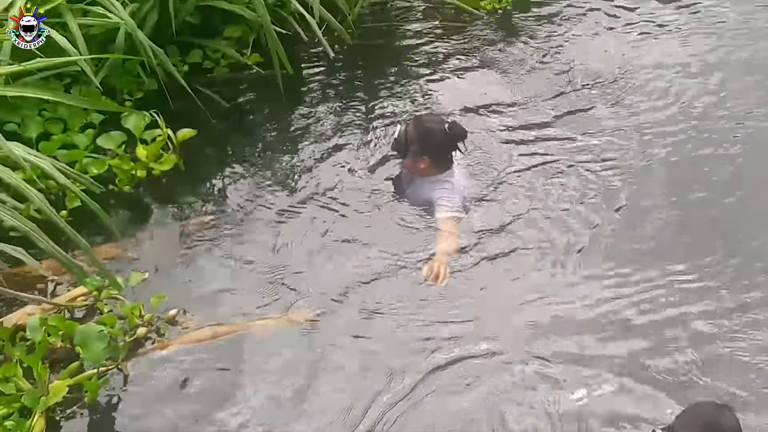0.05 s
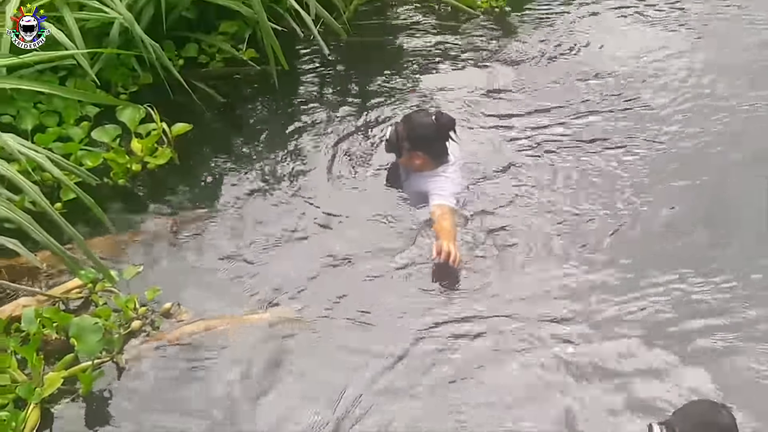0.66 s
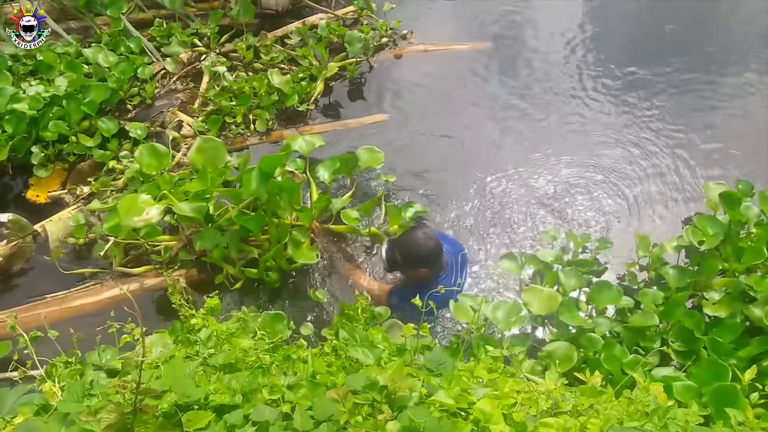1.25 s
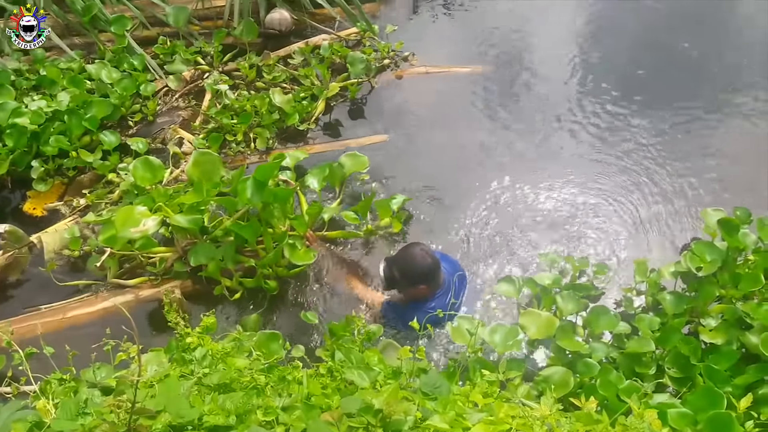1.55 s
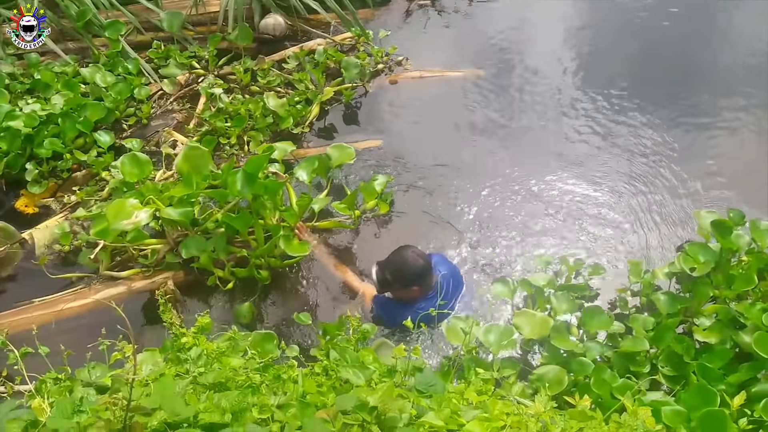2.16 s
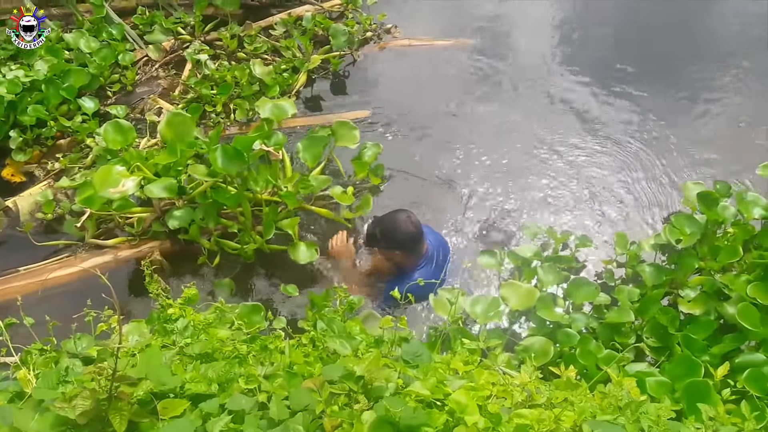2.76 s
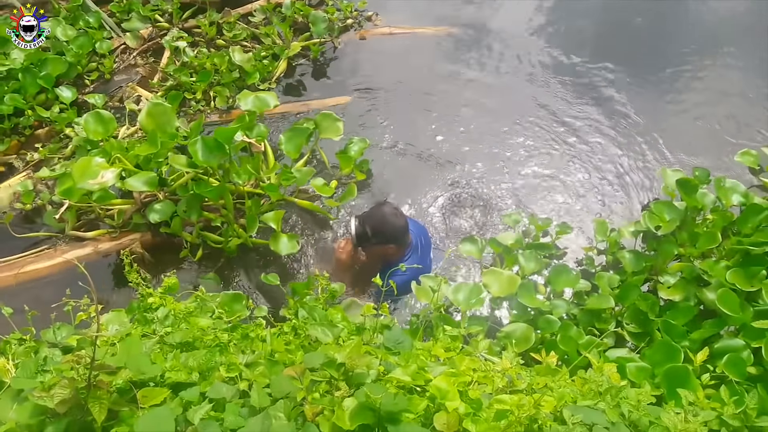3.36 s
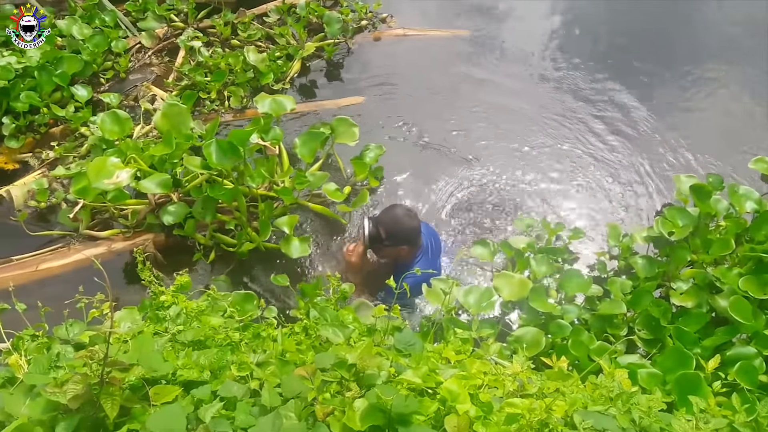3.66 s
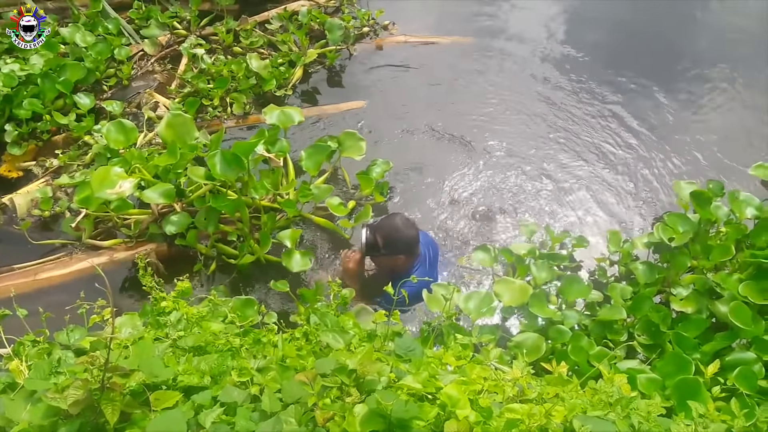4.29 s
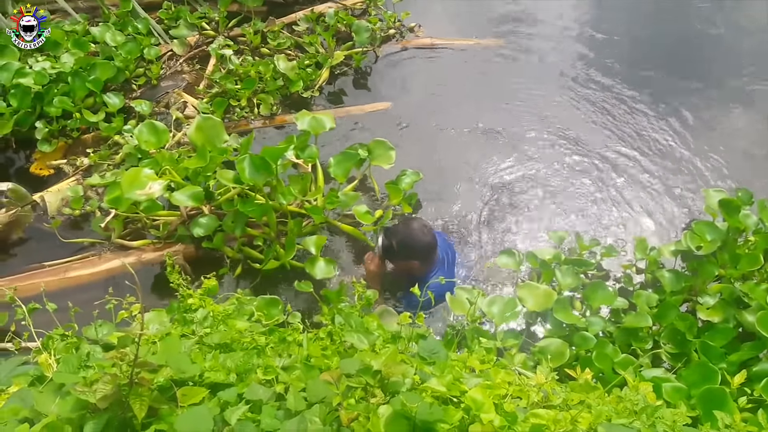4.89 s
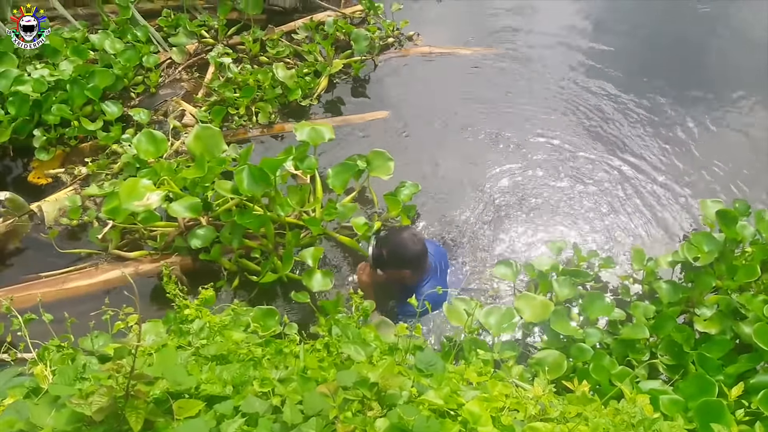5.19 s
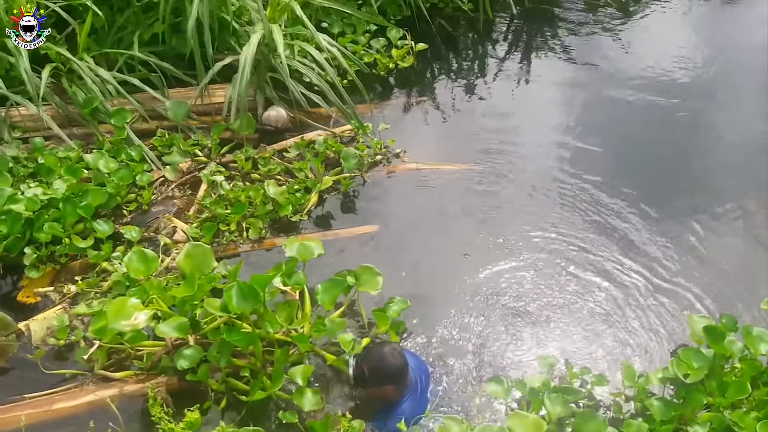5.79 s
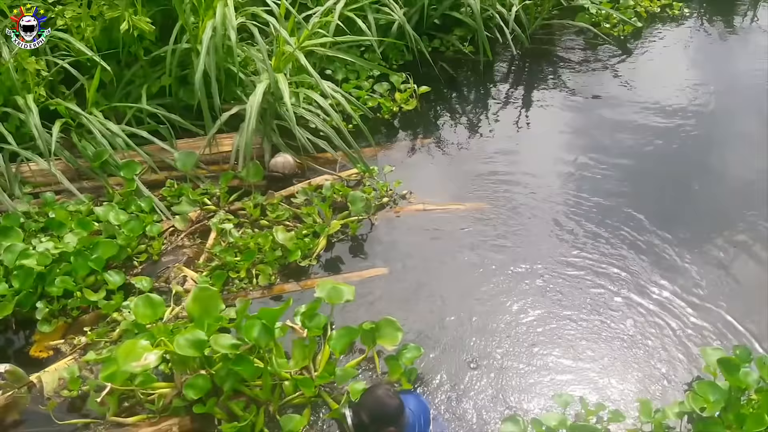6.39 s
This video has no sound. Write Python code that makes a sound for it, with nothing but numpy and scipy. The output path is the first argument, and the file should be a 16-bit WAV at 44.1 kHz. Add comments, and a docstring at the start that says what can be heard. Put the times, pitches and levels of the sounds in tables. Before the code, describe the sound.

Insects buzz steadily over a creek while swimmers wade gently, with soft sloshes, trickles and drips.

```python
"""A weedy creek in the midday heat, heard from the bank; for the first second the sound is duller and the creek
fainter. From the outset insects buzz, their tymbal clicks ringing in resonant bodies, over the creek's murmur.
Swimmers wade gently, and the air they fold into the water rings as sloshes, trickles and drips. A far bird
calls twice in the first two seconds. Past the middle, soft puffs of wind bump the microphone, and near six
seconds a closing pocket of air gives one round gulp."""
import sys
import numpy as np
from scipy import signal
from scipy.fft import rfft, irfft, next_fast_len
from scipy.io import wavfile
from scipy.ndimage import uniform_filter1d

SR = 44100
rng = np.random.default_rng(int(sys.argv[2]) if len(sys.argv) > 2 else 0)


def bounce(signal):
    """Save signal as a 16-bit WAV file at the path given by the first command-line argument."""
    frames = np.transpose(np.atleast_2d(signal))
    limited = np.clip(frames, -1, 1)
    pcm = np.round(limited * 32767).astype(np.int16)
    wavfile.write(sys.argv[1], SR, pcm)


N = 292824
TIME = np.arange(N) / SR
CUTOFF_HZ = 15700


def from_db(db):
    """Amplitude grows tenfold for every 20 dB."""
    return 10 ** (np.asarray(db) / 20)


def unit_rms(x):
    """Normalisation to unit mean power."""
    return x / np.sqrt(np.mean(x ** 2) + 1e-20)


def in_time(rows):
    """Linear interpolation of each column against the first, time in seconds."""
    s, *columns = np.transpose(rows)
    return [np.interp(TIME, s, column) for column in columns]


def drift(hz, step=40):
    """Low-passed noise: a slow random fluctuation with a spread of 1."""
    pole = np.exp(-2 * np.pi * hz * step / SR)
    slow = signal.lfilter([1], [1, -2 * pole, pole ** 2], rng.standard_normal(N // step + 2002))[2000:]
    return np.interp(np.arange(N) / step, np.arange(len(slow)), unit_rms(slow))


def equalise(x, spectrum):
    """Linear filtering by a gain curve that falls steeply past its ends."""
    size = next_fast_len(N)
    hz = np.maximum(np.fft.rfftfreq(size, 1 / SR), 1)
    points, db = np.transpose(sorted(spectrum))
    skirts = np.minimum(hz / points[0], 1) ** 4 * np.minimum(points[-1] / hz, 1) ** 8
    gain = skirts * from_db(np.interp(np.log(hz), np.log(points), db))
    return irfft(rfft(x, size) * gain, size)[:N]


def colour(x, spectrum):
    """Spectral shaping at unit power."""
    return unit_rms(equalise(x, spectrum))


def tymbals(body, clicks_per_s, flutter_db, flutter_hz):
    """Impulse excitation: fluttering clicks ring the bodies of many insects, at even average power."""
    clicks = (rng.random(N) < clicks_per_s / SR) * rng.standard_normal(N)
    buzz = colour(clicks * from_db(flutter_db * drift(flutter_hz)), body)
    return buzz / np.sqrt(uniform_filter1d(buzz ** 2, size=SR // 5))


# Body resonances of four kinds of insect. Each row: frequency in Hz, relative gain in dB.
LOW_BODY = [(5500, -22), (6000, -15.5), (6150, -10.5), (6250, -4), (6370, -6.5), (6530, -0.5), (6720, -1),
            (6850, -2), (7050, -28)]
MAIN_BODY = [(6700, -22), (6880, -10), (7040, -2), (7160, -1.7), (7340, 1.5), (7470, -1.2), (7630, -8.5),
             (7770, -17), (8100, -33)]
HIGH_BODY = [(7500, -12.5), (7900, -4.5), (8050, -7.5), (8290, 0.5), (8480, -1.5), (8900, -2), (9170, -0.5),
             (9450, -3.5), (9820, -10), (10020, -5.5), (10350, -9.5), (10700, -13.5), (11280, -14.5),
             (11900, -25.5)]
SHRILL_BODY = [(10700, -9), (11250, 3), (11800, -6), (12400, -2), (14000, -16), (15500, -19)]
# Loudness of the main kind. Each row: time in seconds, level in dB.
MAIN_LEVEL = [(0.0, -45.5), (0.91, -49.5), (1.02, -47.5), (1.41, -48.5), (2.14, -44.5), (2.75, -49.5),
              (2.79, -46.5), (3.6, -46), (3.77, -49.5), (4.05, -46), (4.55, -48.5), (5.1, -47.5),
              (5.31, -52), (5.57, -46.5), (6.21, -46.5), (6.42, -44.5), (6.53, -48), (6.64, -44)]
# Spells of effort in the high kind. Each row: centre in seconds, change in dB, half-width in seconds.
HIGH_SPELLS = [(.22, 1.5, .17), (.85, -1.5, .2), (5.15, -1.6, .25), (5.88, 1.2, .15), (6.5, 1, .15)]
def chorus():
    """Incoherent sources add in power: the main kind swells and sinks, two grow, one joins late."""
    main_db = in_time(MAIN_LEVEL)[0] + .07 + .75 * drift(hz=4.8)
    low_db = -52.5 + .27 * TIME + .35 * drift(hz=3)
    high_db = -51.3 + .24 * TIME + .35 * drift(hz=3)
    high_db += sum(db * np.exp(-((TIME - s) / half_s) ** 2) for s, db, half_s in HIGH_SPELLS)
    shrill_db, = in_time([(4.6, -79), (6, -69.5)])
    low = from_db(low_db) * tymbals(LOW_BODY, clicks_per_s=18000, flutter_db=.5, flutter_hz=60)
    main = from_db(main_db) * tymbals(MAIN_BODY, clicks_per_s=14000, flutter_db=.5, flutter_hz=130)
    high = from_db(high_db) * tymbals(HIGH_BODY, clicks_per_s=24000, flutter_db=-.25, flutter_hz=300)
    shrill = from_db(shrill_db) * tymbals(SHRILL_BODY, clicks_per_s=4800, flutter_db=3.5, flutter_hz=40)
    return low + main + high + shrill


def whistle(rows, waver_hz, flicker_db, fade_s):
    """A sinusoid with slight random frequency and amplitude modulation."""
    hz, db = in_time(rows)
    start, end = rows[0][0], rows[-1][0]
    singing, = in_time([(start - fade_s, 0), (start, 1), (end, 1), (end + fade_s, 0)])
    tone = np.sin(2 * np.pi * np.cumsum(hz + waver_hz * drift(hz=41)) / SR)
    return singing * from_db(db) * unit_rms(tone * from_db(flicker_db * drift(hz=25)))


# Held notes, one list per insect. Each row: time in seconds, frequency in Hz, level in dB.
WHINES = [
    [(0, 7040, -50.5), (.8, 7078, -55), (1.15, 7074, -52.5), (1.7, 7006, -55), (3.8, 7086, -54.5),
     (5.3, 7100, -55), (6.64, 7060, -50)],
    [(3.9, 6750, -66), (4.5, 6770, -61), (5.0, 6775, -54), (5.5, 6760, -54), (5.9, 6770, -59)],
    [(0, 8800, -68), (6.64, 8700, -65)],
    [(0, 6240, -71), (6.64, 6240, -67)],
]
def whines():
    """Sustained oscillation: single insects each hold a thin, nearly pure tone."""
    return sum(whistle(rows, waver_hz=13.1, flicker_db=2, fade_s=.1) for rows in WHINES)


def opening_second(until_s=1):
    """A step function: 1 during the first second, then 0."""
    return in_time([(until_s - .005, 1), (until_s + .005, 0)])[0]


# Spectra of running water. Each row: frequency in Hz, relative spectral density in dB.
MURMUR = [(25, -19), (50, -13), (85, -2.5), (140, 0), (330, -0.5), (520, -4), (700, -4), (900, -1),
          (1150, -3), (1450, -5), (2250, -6.5), (2800, -14), (4500, -23)]
HISS = [(1800, -15), (2800, -3.5), (3600, 2.5), (4500, 2.5), (6000, -5.5), (10000, -15.5), (12300, -9),
        (13400, -15), (14400, -14), (14800, -5), (15200, -12), (16000, -16)]
def creek():
    """Broadband flow noise: a distant low murmur and a fine hiss, both weaker in the first second."""
    murmur_db = -58.5 - opening_second() + .61 * drift(hz=11)
    murmur = from_db(murmur_db) * colour(rng.standard_normal(N), MURMUR)
    hiss_db = -67 - 4.5 * opening_second() + .5 * drift(hz=18)
    return murmur + from_db(hiss_db) * colour(rng.standard_normal(N), HISS)


# Faint stereo background: low ambient rush plus high microphone hiss.
# Each row: frequency in Hz, relative spectral density in dB.
SIDE_NOISE_SPECTRUM = [(40, -20), (90, -2), (170, 4.5), (700, 2.5), (2200, -1.5), (4500, -19), (6000, -42),
                       (6900, -42), (10500, -41), (12500, -23), (14700, -11), (15700, -15)]
def ambience_and_mic_hiss():
    """Decorrelation: ambient rush and microphone self-noise, opposite in the two channels, add width."""
    return from_db(-74.5) * colour(rng.standard_normal(N), SIDE_NOISE_SPECTRUM) * np.array([[1], [-1]])


def bubble_cloud(per_s, low_hz, high_hz, cycles, spread_db, sizes=24):
    """Minnaert resonance: tiny bubbles, born at random, each ring at the pitch of their size."""
    births = (rng.random(N) < per_s / SR) * rng.choice([-1, 1], N)
    kicks = births * from_db(spread_db * np.minimum(rng.exponential(1, N), 3))
    size_class, out = rng.integers(0, sizes, N), np.zeros(N)
    for k, hz in enumerate(np.geomspace(low_hz, high_hz, sizes)):
        radius = np.exp(-np.log(1000) * hz / (cycles * SR))  # 60 dB of decay over the given cycles
        resonator = [1, -2 * radius * np.cos(2 * np.pi * hz / SR), radius ** 2]
        ringing = signal.lfilter([1, 0, -1], resonator, kicks * (size_class == k) + 1e-18)
        out += unit_rms(ringing) * np.sqrt(hz)
    return out


def swell(peak_s, db, rise_s, fall_s):
    """Power envelope of a movement: Gaussian rise, exponential decay."""
    t = TIME - peak_s
    return (from_db(db) * np.exp(-(np.minimum(t, 0) / rise_s) ** 2 - np.maximum(t, 0) / fall_s)) ** 2


# Strokes of arms and body through the water.
# Each row: peak time in seconds, slosh level in dB, spray level in dB, rise and fall in seconds.
STROKES = [(0.0, -57.5, -63, .04, .33), (.33, -66, -68, .1, .12), (.985, -55.5, -63, .012, .1),
           (1.08, -59, -68, .04, .07), (1.5, -71, -66.5, .1, .5), (2.735, -58.5, -65, .04, .2),
           (2.93, -59.5, -61, .05, .15), (3.04, -58.5, -62.5, 0.045, .14), (5.73, -54.5, -62, 0.031, .035),
           (5.86, -62, -69, 0.036, .08), (6.01, -56, -66, .025, .12), (6.47, -67, -68, .1, .1)]
# Colours of slosh and spray. Each row: frequency in Hz, relative gain in dB.
SLOSH = [(200, -19), (440, -7), (590, 1), (780, -4.5), (980, -5.5), (1150, -6), (1400, -11), (1900, -8.5),
         (2500, -13), (3500, -21)]
SPRAY = [(1200, -9), (1950, 4), (2350, 6), (3000, 1.5), (3550, 6), (3900, 1), (5000, 5), (7000, -14),
         (11000, -15), (15000, -18)]
def sloshing(rest_slosh_db=-77, rest_spray_db=-84):
    """Air entrainment: each stroke folds in bubbles and throws spray; between strokes the water laps."""
    slosh_power = sum(swell(s, db, rise, fall) for s, db, _, rise, fall in STROKES)
    spray_power = sum(swell(s, db, rise, fall) for s, _, db, rise, fall in STROKES)
    slosh = colour(bubble_cloud(per_s=1100, low_hz=300, high_hz=3000, cycles=24, spread_db=2), SLOSH)
    spray = colour(bubble_cloud(per_s=1500, low_hz=1810, high_hz=12900, cycles=28, spread_db=3), SPRAY)
    slosh *= np.sqrt(slosh_power + from_db(rest_slosh_db) ** 2)
    spray *= np.sqrt(spray_power + from_db(rest_spray_db) ** 2)
    return slosh + spray


# Tugs on the floating weeds. Each row: peak time in seconds, level in dB.
WEED_TUGS = [(.11, -69), (1.03, -66), (1.4, -70), (1.75, -65), (2.35, -67), (2.72, -60), (3.07, -61),
             (4.95, -72), (6.01, -70)]
# Colour of the run-off. Each row: frequency in Hz, relative gain in dB.
TRICKLE_COLOUR = [(3250, -9), (3530, -0.5), (3800, -15), (4250, -1), (4750, 0.5), (5300, 1.5), (6500, -6),
                  (9000, -14)]
def trickle(rest_db=-81):
    """Shot noise: fine droplets run off the weeds and tick on leaves and water, fading after each tug."""
    power = from_db(rest_db) ** 2 + sum(swell(s, db, rise_s=.05, fall_s=.4) for s, db in WEED_TUGS)
    ticks = bubble_cloud(per_s=700, low_hz=3230, high_hz=8420, cycles=75, spread_db=2.5)
    return np.sqrt(power) * colour(ticks, TRICKLE_COLOUR)


def leaf_echo(x, t60_s=.12):
    """Multiple scattering: the leaves of the bank spread a sound into a brief, dense tail."""
    t = np.arange(SR // 4) / SR
    tail = rng.standard_normal(len(t)) * from_db(-60 * t / t60_s)
    return signal.fftconvolve(x, tail / np.sqrt(np.sum(tail ** 2)))[:N]


# The bird's notes. Each row: centre and length in seconds, top frequency in Hz,
# fall to either end in Hz, level in dB.
BIRD_NOTES = [(.293, .11, 4335, 330, -60), (1.625, .1, 4735, 90, -65)]
def bird(ends_db=-9):
    """Frequency modulation: two far whistles arch in pitch and level, blurred by the leaves."""
    position, song = np.linspace(-1, 1, 9), np.zeros(N)
    for s, length, hz, fall_hz, db in BIRD_NOTES:
        arch = [s + position * length / 2, hz - fall_hz * position ** 2, db + ends_db * position ** 2]
        song += whistle(np.transpose(arch), waver_hz=30, flicker_db=1.5, fade_s=.008)
    return song + from_db(-4) * leaf_echo(song)


# Drops and small slaps on the surface.
# Each row: start in seconds, level in dB, frequency in Hz, time to decay by 60 dB in seconds.
DROPS = [(.908, -52, 4300, .02), (.98, -46, 627, 0.045), (1.263, -44.5, 4170, .025),
         (1.264, -47.5, 1950, .015), (1.688, -47, 4620, .03), (2.704, -39.5, 390, 0.023),
         (2.931, -40, 1640, .025), (3.098, -44, 2010, 0.028), (3.131, -48, 2280, .02),
         (3.503, -38, 350, 0.019), (3.625, -47, 219, .04), (4.193, -48.5, 2230, .04),
         (4.945, -48.5, 3480, .02), (5.635, -48, 2840, .02), (5.683, -45, 1950, 0.02),
         (5.717, -41, 2600, 0.03), (5.718, -46, 1150, .02), (5.738, -44, 2290, .03),
         (5.794, -45, 1750, .025), (5.922, -49, 2550, 0.028), (6.002, -50, 5260, 0.05),
         (6.314, -50, 1950, .02), (6.469, -50, 2200, .02)]
def drops(splat_s=.0072, glide=.065):
    """Impact and damped oscillation: a drop lands with a splat and traps a bubble that pings."""
    out, t = np.zeros(N), np.arange(SR // 10) / SR
    for s, db, hz, t60 in DROPS:
        phase = 2 * np.pi * hz * t * (1 + glide * (t / t60 - .5) / 2)
        ping = np.sin(phase) * from_db(-60 * t / t60)
        band = signal.butter(2, [hz * .72, hz * 1.21], "band", fs=SR, output="sos")
        splat = unit_rms(signal.sosfilt(band, rng.standard_normal(len(t)))) * np.exp(-t / splat_s)
        add(out, s, from_db(db) * (.8 * ping + .37 * splat))
    return out


# Ringing air pockets; the loudest cluster is the gulp. Each row: start in seconds, level in dB,
# first and last frequency in Hz, length and attack in seconds.
AIR_POCKETS = [(2.714, -50, 3400, 3600, 0.027, 0.013), (2.813, -56.5, 229, 300, 0.037, 0.0088),
               (2.875, -51.5, 480, 623, 0.025, .008), (2.902, -48.5, 680, 850, 0.022, .004),
               (2.975, -53, 617, 680, 0.03, 0.0062), (3.057, -52.5, 2300, 2430, 0.021, .004),
               (4.811, -55.5, 319, 348, 0.04, .008), (5.648, -50.5, 2780, 2870, 0.0087, .003),
               (5.848, -50.5, 1270, 1380, 0.019, .004), (5.945, -38, 750, 699, 0.013, .001),
               (5.946, -34, 820, 1360, 0.025, 0.0094), (5.953, -47.5, 687, 803, 0.044, 0.0033),
               (5.966, -49, 1100, 1000, .018, .003), (6.003, -52, 417, 550, 0.067, 0.0069),
               (6.014, -47, 710, 760, .011, .002)]
def air_pockets():
    """Volume pulsation: large bubbles ring, most rising in pitch near the surface, until they burst."""
    out = np.zeros(N)
    for s, db, start_hz, end_hz, length, attack in AIR_POCKETS:
        t = np.arange(int(length * SR) + 2) / SR
        age = t / t[-1]
        envelope = np.minimum(t / attack, 1) * np.sqrt(1 - age ** 2) * np.minimum((1 - age) * 10, 1)
        hz = start_hz + (end_hz - start_hz) * age
        add(out, s, from_db(db) * envelope * np.sin(2 * np.pi * np.cumsum(hz) / SR))
    return out


# Gusts on the microphone. Each row: peak time in seconds, level in dB, half-width in seconds.
GUSTS = [(3.78, -53, .018), (3.828, -46, .016), (3.935, -60, .025), (4.058, -40.5, .036),
         (4.115, -51, .025), (4.177, -45, .017), (4.232, -55, .015), (4.71, -58, .016),
         (4.858, -48.5, .016), (4.91, -47, .016), (6.17, -57, .015), (6.545, -43, .03), (6.6, -53, .04)]
# Pressure spectrum of the eddies. Each row: frequency in Hz, relative density in dB.
EDDY_SPECTRUM = [(28, -13), (55, -6), (86, 3), (112, -.5), (140, -2.5), (172, -18), (300, -33)]
def wind(eddy_s=.0254):
    """Turbulent pressure: as each gust swells and fades, its eddies push the microphone to and fro."""
    strength = sum(from_db(db) / (1 + ((TIME - s) / half_s) ** 2) ** 2 for s, db, half_s in GUSTS)
    eddies = colour(rng.standard_normal(N), EDDY_SPECTRUM)
    return strength * eddies / np.sqrt(uniform_filter1d(eddies ** 2, size=int(eddy_s * SR)))


def add(out, s, sound):
    """Superposition of a short sound, starting at s seconds."""
    at = int(np.clip(s * SR, 0, N))
    out[at:at + len(sound)] += sound[:N - at]


# Colouring of the first second. Each row: frequency in Hz, gain in dB.
OPENING_COLOUR = [(25, 3), (100, -1), (300, 0.5), (430, -2), (720, 2.5), (950, -4.5), (1300, -1), (1900, 0.5),
                  (2400, -0.5), (4200, 0), (5000, -5.5), (6000, 0), (7200, -1.5), (8200, 2.5), (9500, -3),
                  (10050, -1), (10700, -5.5), (11600, -7.5), (13500, 0), (15500, 1)]
def scene():
    """Superposition: only the faint background has width; in the first second insects and water are shaded."""
    water = sloshing() + trickle() + air_pockets() + drops()
    centre = chorus() + whines() + creek() + water
    centre = opening_second() * equalise(centre, OPENING_COLOUR) + (1 - opening_second()) * centre
    return centre + ambience_and_mic_hiss() + bird() + wind()


def record(dry, offset=-.001):
    """Band limiting: the top is cut steeply, and the converter rests a little below zero."""
    lowpass = signal.ellip(10, .1, 70, CUTOFF_HZ, fs=SR, output="sos")
    return signal.sosfilt(lowpass, dry) + offset


dry = scene()
out = record(dry)
bounce(out)
```